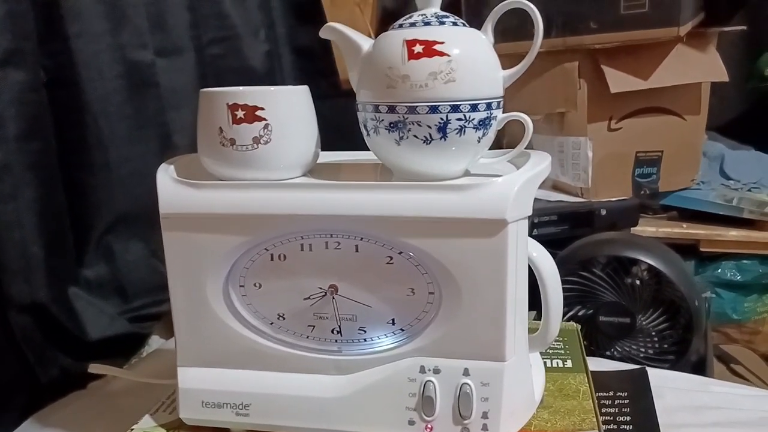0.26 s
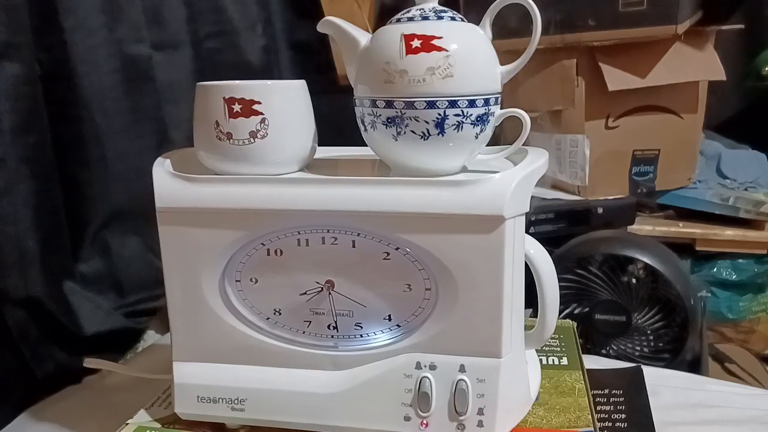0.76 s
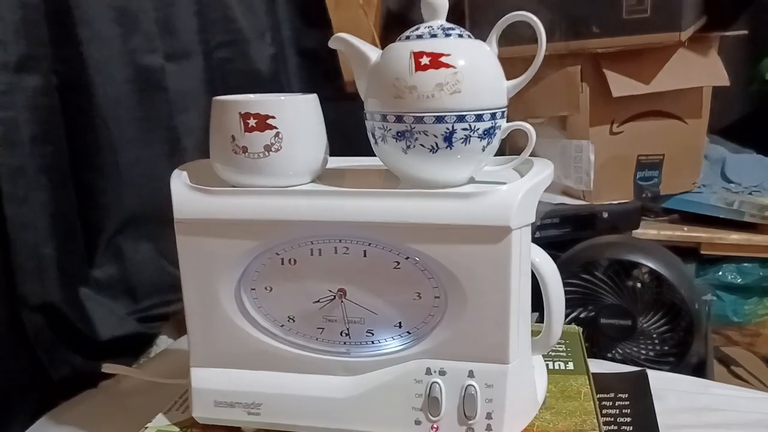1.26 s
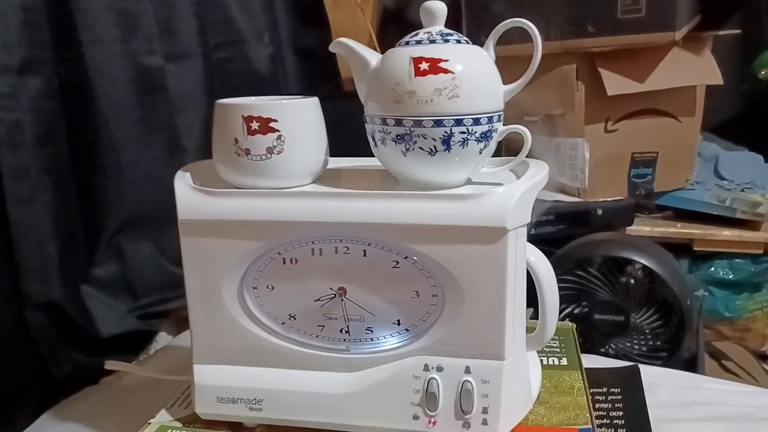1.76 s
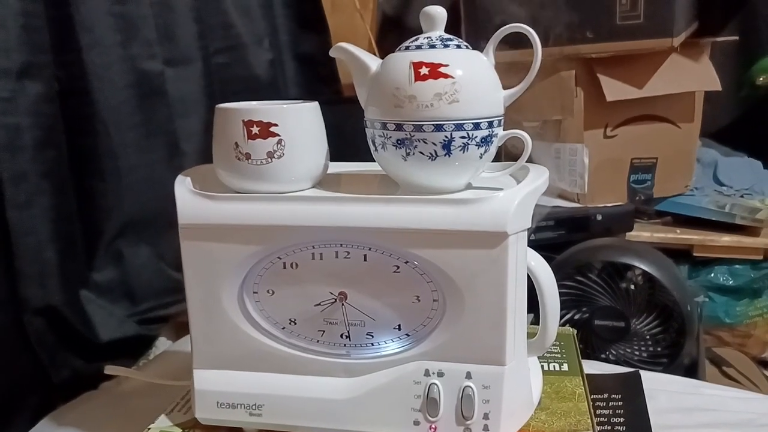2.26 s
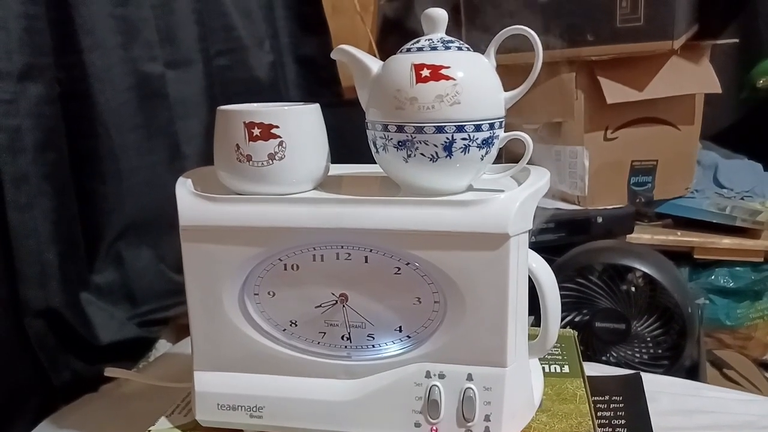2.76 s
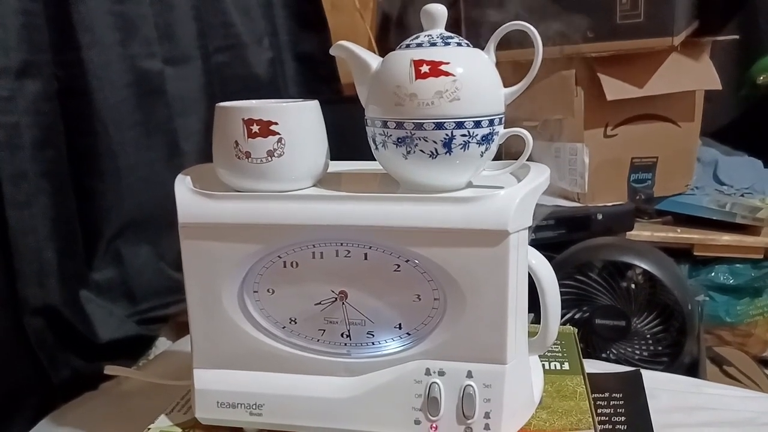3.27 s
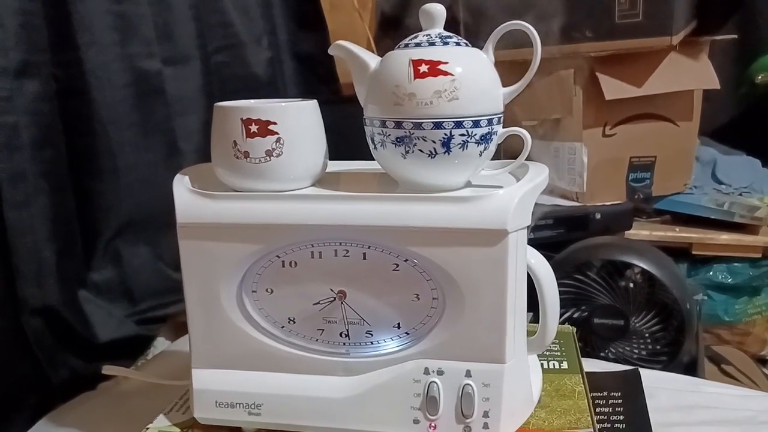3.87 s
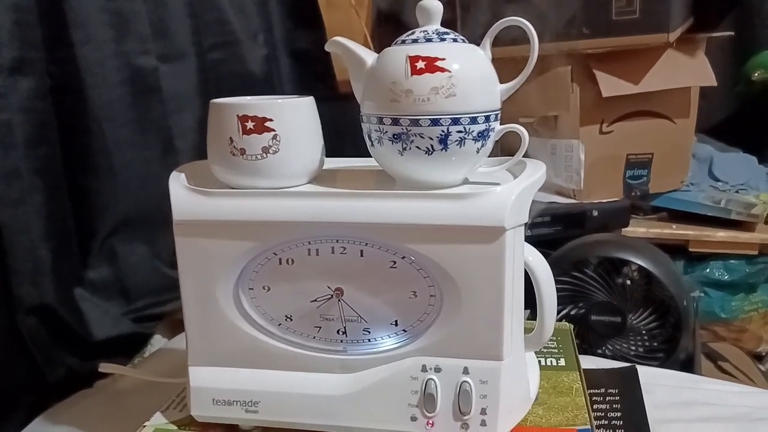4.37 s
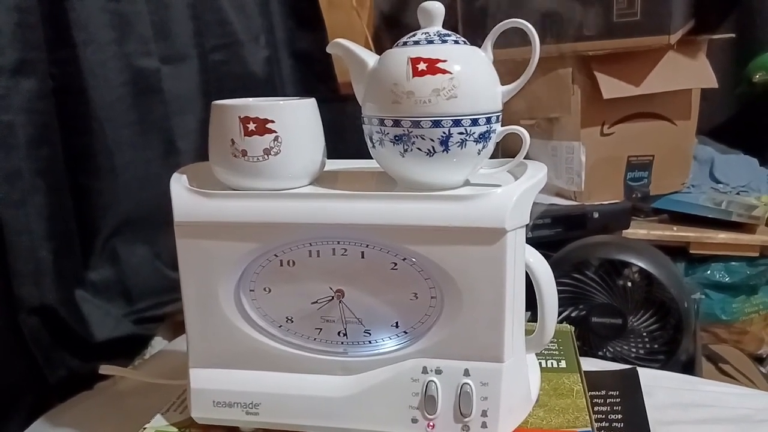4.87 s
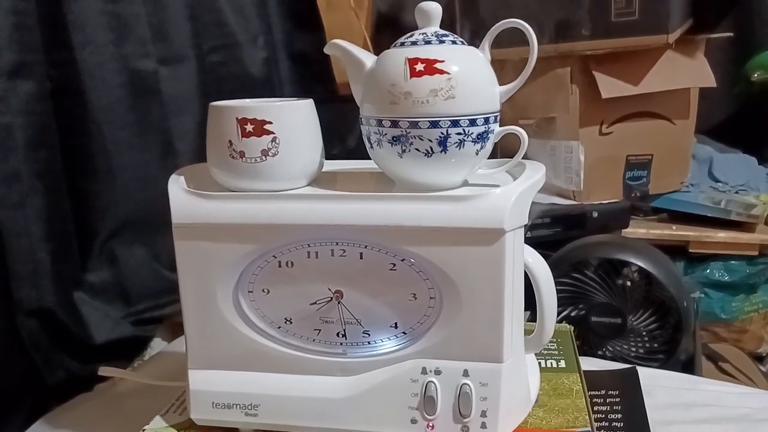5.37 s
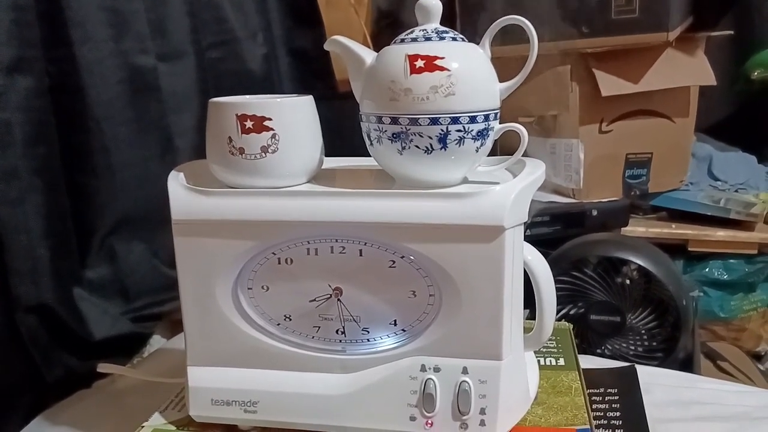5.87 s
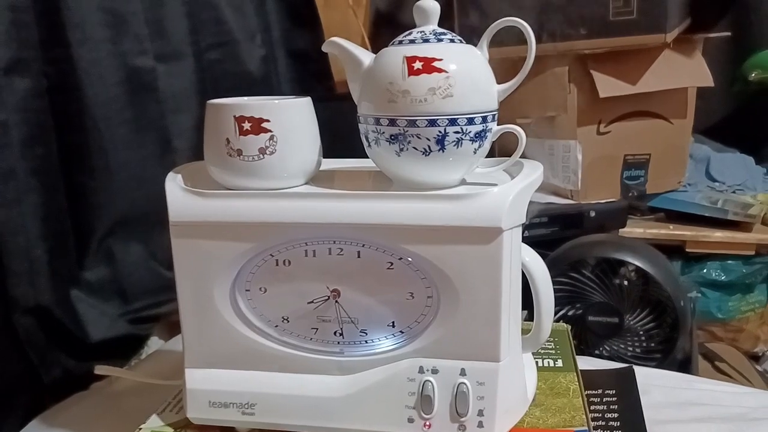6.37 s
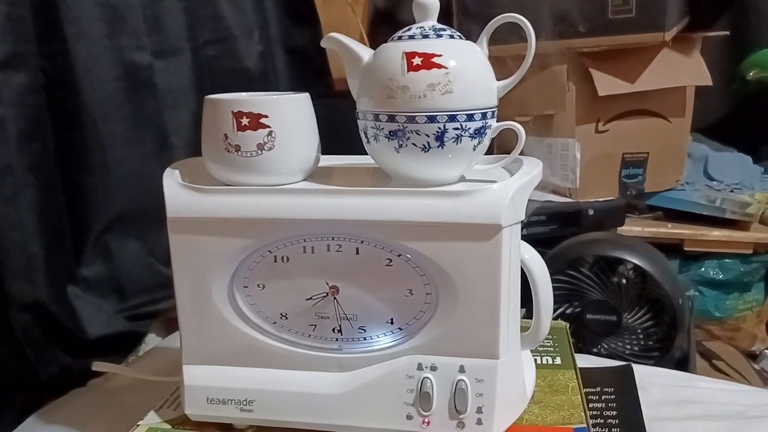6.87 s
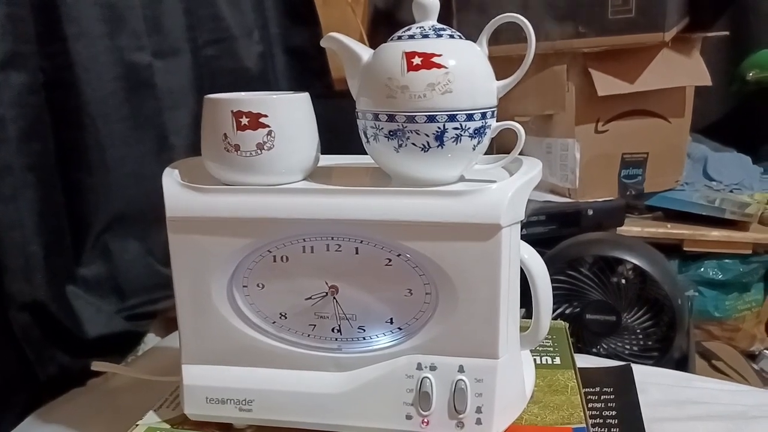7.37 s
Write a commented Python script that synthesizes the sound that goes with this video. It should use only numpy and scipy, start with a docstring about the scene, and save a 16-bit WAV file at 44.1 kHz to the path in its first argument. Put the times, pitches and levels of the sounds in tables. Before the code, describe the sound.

Water boils hard inside a small bedside tea maker, hollow rapid bubbling rumble gradually breaking into spluttering gurgles and fizzing spits, close up indoors.

```python
"""Small furnished room: a bedside tea maker boils close to two microphones.
Water boils in surges, about four a second; collapsing bubbles (short pushes) ring the tank's resonances hollowly.
The steady rumble breaks up into splutters; spits ping the case and throw bursts of fizz (shaped noise).
A thin steam hiss fades early. The clock ticks (paired clicks through a gear resonance).
A faint gliding sine whine arcs up and down three times, over steady room noise."""
import sys
import numpy as np
from scipy import signal
from scipy.fft import rfft, irfft
from scipy.io import wavfile
from scipy.ndimage import uniform_filter1d, map_coordinates

SR = 44100
rng = np.random.default_rng(int(sys.argv[2]) if len(sys.argv) > 2 else 0)


def transcribe(u):
    """Save the signal u as a 16-bit wav file named by the first command-line argument.

    u: samples, shape (n,) or (channels, n), limited to [-1, 1]; the rate is SR.
    q: integer samples, one column per channel.
    """
    v = np.clip(np.atleast_2d(u).T, -1, 1)
    q = np.round(v * 32767).astype(np.int16)
    wavfile.write(sys.argv[1], SR, q)


N = 336924
TIME = np.arange(N) / SR
SIZE = 2 ** 15  # samples per impulse response
FREQ = np.maximum(np.fft.rfftfreq(SIZE, 1 / SR), 1)
TOP_HZ = 15700

# room and microphone hiss: (frequency [Hz], relative density [dB per Hz])
AIR_COLOUR = [(42, -35.5), (62, 5), (120, 2.5), (550, -1.5), (1100, -17.5), (3500, -25.5), (13000, -33.5)]
# microphone imbalance: (frequency [Hz], left minus right [dB])
BALANCE = [(110, -0.5), (370, -1.5), (600, 2), (1500, -9), (2300, -13), (5500, 2.5)]
# steady simmer: (time [s], level [dB])
SIMMER_LEVEL = [(0, -44.5), (1.2, -66.5), (2, -71.5), (7.64, -68.5)]
# surges of boiling on the element: (time of height [s], level [dB], fall to 1/e power [s])
BOIL_SURGES = [(0.064,-46.5,0.01),(0.218,-41,0.038),(.445,-48,0.083),(0.691,-39.5,0.047),(0.79,-47.5,0.047),(1.066,-43.5,0.079),(1.373,-54,0.084),(1.572,-50,0.062),(1.812,-47,0.04),(2.09,-47.5,0.036),(2.225,-56.5,0.031),(2.368,-50.5,0.099),(2.645,-49,0.058),(2.9,-51.5,0.082),(3.16,-49.5,0.042),(3.443,-43.5,0.033),(3.634,-48.5,0.026),(3.85,-55.5,0.12),(4.133,-54,0.054),(4.372,-58,0.077),(4.538,-51.5,0.028),(4.765,-54.5,0.057),(4.961,-56,0.076),(5.187,-47.5,0.024),(5.394,-52,0.048),(5.626,-50.5,0.039),(5.886,-50.5,0.042),(6.189,-54,0.094),(6.419,-52.5,0.048),(6.629,-50,0.041),(6.955,-54,0.025),(7.115,-55.5,0.037),(7.298,-52,0.031)]
# large steam bubbles collapsing: (time [s], level [dB])
BUBBLE_COLLAPSES = [(0.01, -27), (0.063, -25.5), (0.155, -23), (0.174, -22.5), (0.208, -17), (0.226, -15),
                    (0.268, -21), (0.319, -30), (0.359, -22), (0.427, -25.5), (0.456, -20.5), (0.495, -21),
                    (0.545, -19.5), (0.616, -21), (0.659, -21), (0.669, -24), (0.699, -18), (0.739, -23),
                    (0.777, -21), (0.809, -19.5), (0.853, -23.5), (0.867, -19), (0.914, -22),
                    (0.977, -24.5), (1.018, -22), (1.046, -17), (1.067, -21), (1.174, -20), (1.21, -21),
                    (1.267, -26.5), (1.302, -30), (1.32, -24), (1.364, -25), (1.393, -23), (1.452, -26.5),
                    (1.565, -21.5), (1.583, -20), (1.61, -22.5), (1.7, -27.5), (1.792, -21), (1.839, -17.5),
                    (1.91, -24.5), (2.068, -24.5), (2.177, -32.5), (2.192, -31), (2.223, -26.5),
                    (2.304, -28), (2.339, -22), (2.407, -18), (2.517, -23.5), (2.618, -21.5),
                    (2.656, -22.5), (2.691, -29), (2.754, -30), (2.807, -24), (2.855, -26.5),
                    (2.898, -20.5), (2.92, -16), (2.95, -22), (3.008, -35.5), (3.066, -24.5), (3.087, -20),
                    (3.118, -24.5), (3.164, -21.5), (3.192, -24.5), (3.339, -30), (3.408, -19.5),
                    (3.421, -20), (3.458, -21), (3.593, -29), (3.654, -22.5), (3.773, -25.5),
                    (3.887, -23.5), (3.95, -25), (3.985, -29.5), (4.022, -29), (4.107, -35), (4.152, -26),
                    (4.259, -32), (4.346, -24.5), (4.402, -22.5), (4.517, -17.5), (4.652, -32), (4.7, -28),
                    (4.736, -27.5), (4.76, -25), (4.788, -22.5), (4.938, -26.5), (4.976, -26.5),
                    (5.029, -23), (5.087, -32), (5.178, -19.5), (5.253, -26.5), (5.373, -22), (5.391, -20),
                    (5.41, -24), (5.441, -22), (5.492, -23), (5.585, -19.5), (5.616, -19), (5.637, -18.5),
                    (5.751, -32), (5.805, -26.5), (5.839, -27), (5.866, -17), (5.92, -23.5), (6.029, -32.5),
                    (6.064, -28), (6.172, -24.5), (6.276, -26.5), (6.326, -28.5), (6.373, -29),
                    (6.403, -21), (6.426, -28.5), (6.54, -24.5), (6.603, -24.5), (6.637, -21), (6.653, -25),
                    (6.751, -30.5), (6.803, -24), (6.833, -29), (6.88, -34), (6.976, -30), (7.039, -27.5),
                    (7.127, -27), (7.166, -26), (7.295, -25.5), (7.466, -37), (7.522, -28), (7.603, -38.5)]
# resonances of the water-filled tank: (frequency [Hz], width at half power [Hz], relative level [dB])
TANK_MODES = [(66, 7.5, -26), (115.9, 35, -8.5), (158, 32, -18.5), (221.3, 30.8, -6.5), (263.8, 53, -6.5),
              (389.6, 51, -12.5), (470.1, 23, -6), (538, 53.6, 0), (566, 49, -4.5), (660.7, 47.6, -4.5),
              (822, 55, -22)]
# modes of the case: (frequency [Hz], width at half gain [Hz], relative level [dB])
CASE_MODES = [(1594, 220, -9.5), (2614, 190, -11.5), (3460, 310, -10), (3840, 270, -13.5)]
# bubbles bursting on hot metal: (time [s], relative level [dB])
METAL_SPITS = [(0.07,-22),(.186,-11.5),(.226,-27),(0.459,-16.5),(.524,-21),(.564,-17),(.66,-19),(0.685,-15),(0.78,-16),(1.077,-12.5),
               (1.176,-25),(1.213,-21.5),(1.268,-21.5),(1.392,-24),(2.079,-31),(2.095,-19),(2.517,-27.5),(2.691,-21.5),
               (3.411,-24),(3.445,-15),(4.151,-23.5),(4.516,-26),(5.412,-26),(5.662,-27),(5.868,-24),
               (6.426,-23.5),(6.49,-29),(6.539,-26),(6.657,-20)]
# colour of the fizz: (frequency [Hz], relative density [dB per Hz])
FIZZ_COLOUR = [(900, 9), (1300, -7.5), (1650, -13), (2100, -7.5), (2620, -1.5), (2950, -7), (3400, 9),
               (3950, -1), (4500, -17), (6300, -7), (7600, -30), (15500, -26.5)]
# whine arcs: (time of top [s], top pitch [Hz], half length [s], level [dB])
WHINE_ARCS = [(1.352, 9380, 0.22, -73.5), (4.094, 9700, 0.23, -75.5), (6.5, 9440, 0.21, -81),
              (6.668, 9130, .1, -82)]


def undb(db):
    """Decibels to gain."""
    return 10 ** (np.asarray(db) / 20)


def unit(x):
    """Scale to rms 1."""
    return x / np.sqrt(np.mean(x ** 2))


def colour(points):
    """Gain over FREQ, interpolated in dB over log frequency."""
    hz, db = np.transpose(points)
    return undb(np.interp(np.log(FREQ), np.log(hz), db))


def causal(gain):
    """Minimum-phase impulse response with this gain, by folding the cepstrum."""
    cepstrum = irfft(np.log(gain))
    cepstrum[1:SIZE // 2] *= 2
    cepstrum[SIZE // 2 + 1:] = 0
    return irfft(np.exp(rfft(cepstrum)))


def ring(x, response):
    """Convolve, cut to N samples."""
    return signal.fftconvolve(x, response)[:N]


def resonance(hz, half_width_hz):
    """Gain of one resonance; half gain at half_width_hz off centre."""
    return 1 / (1 + ((FREQ - hz) / half_width_hz) ** 2)


def softness(push_s):
    """Short smooth push of area 1, peaking at twice push_s."""
    t = np.arange(400) / SR
    push = (t / push_s) ** 2 * np.exp(-t / push_s)
    return push / push.sum()


def strikes(times_s, sizes):
    """Impulse train."""
    places = np.clip(times_s * SR, 0, N).astype(int)
    return np.bincount(places, sizes, N + 1)[:N]


def patter(rate_hz, spread_db):
    """Random impulses of either sign; exponential spread of dB sizes; rms 1."""
    present = rng.random(N) < rate_hz / SR
    size = np.minimum(rng.exponential(size=N), 4)
    sign = rng.choice([-1, 1], N)
    return unit(present * sign * undb(spread_db * size))


def air(air_db=-68, apart_hz=900):
    """Steady room noise: shared in the bass, unrelated in the treble."""
    own = 1 / np.sqrt(1 + (apart_hz / FREQ) ** 2)
    shared_response = causal(colour(AIR_COLOUR) * np.sqrt(1 - own ** 2))
    own_response = causal(colour(AIR_COLOUR) * own * np.sqrt(2))
    shared = ring(rng.standard_normal(N), shared_response)
    apart = np.array([ring(rng.standard_normal(N), own_response) for _ in range(2)])
    return undb(air_db) * unit(shared + apart)


def seething(rise_share=0.78):
    """Boil amplitude: simmer plus surges that rise a little faster than they fall."""
    power = undb(2 * np.interp(TIME, *np.transpose(SIMMER_LEVEL)))
    for height_s, db, fall_s in BOIL_SURGES:
        age = (TIME - height_s) / fall_s
        square = np.minimum(age, age / rise_share) ** 2
        power = power + undb(2 * db) * np.exp(-np.minimum(square, 20))
    return np.sqrt(power)


def churning(memory_s):
    """Power stirred up by the large collapses, decaying exponentially."""
    time_s, db = np.transpose(BUBBLE_COLLAPSES)
    return np.abs(ring(strikes(time_s, undb(2 * db)), np.exp(-TIME[:SIZE] / memory_s)))


def wake(wake_s=0.013):
    """Amplitude of the churn left by the large collapses."""
    return np.sqrt(churning(wake_s))


def frothing(seethe, depth=0.11, memory_s=0.0099, froth_db=-32):
    """Fizz drive: follows the boil, flares with each collapse and sinks until the next."""
    churn = churning(memory_s)
    usual = np.abs(uniform_filter1d(churn, size=5000)) + 1e-7
    flare = (churn / usual + .1) ** depth
    return np.hypot(seethe * flare, undb(froth_db) * wake())


def sloshed(response, shift):
    """Ring moved in pitch by a share, as the water moves."""
    samples = np.arange(len(response))
    return np.interp(samples * (1 + shift), samples, response)


def collapses(response, mean_push_s=0.00011, low_hz=420, high_hz=790, cycles=2.09, mean_wobble=2.41,
              lead_s=0.001998, flurry_s=0.008, fragment_peak=0.5024, slosh_span=0.03, count=5):
    """Each bubble slams shut amid fragments; leftover gas wobbles at its own pitch, all ringing the tank."""
    t = np.arange(1600) / SR
    span, slam = 8192, 600  # samples: plop length, slam position
    out = np.zeros(N + 2 * span)
    for time_s, db in BUBBLE_COLLAPSES:
        speed, size, sway, depth = rng.random(4)
        when, force = rng.random((2, count))
        hz = low_hz * (high_hz / low_hz) ** size
        age_s = np.maximum(t - slam / SR, 0)
        wobble = mean_wobble * (.5 + sway) * 2 * hz / (cycles * SR)
        push = wobble * np.sin(2 * np.pi * hz * age_s) * np.exp(-age_s * hz / cycles)
        push[slam] += 1
        # fragments start lead_s before the slam, then thin out exponentially
        moments = slam - (lead_s + flurry_s * np.log(when)) * SR
        moments = np.clip(moments, 0, len(t) - 1).astype(int)
        push += np.bincount(moments, fragment_peak * (2 * force - 1), len(t))
        body = sloshed(response[:span - len(t)], slosh_span * (depth - .5))
        soft = softness(mean_push_s * (.5 + speed))
        plop = irfft(rfft(push, span) * rfft(soft, span) * rfft(body, span))
        peak = np.sqrt(2 * uniform_filter1d(plop ** 2, size=130).max())
        start = max(int(time_s * SR), 0)
        out[start:start + span] += undb(db) * plop / peak
    return out[slam:slam + N]


def tank_response(leak_db=-51, bass_lag_s=0.0057, bass_hz=170):
    """Tank resonances plus wall leakage; the bass follows a moment late."""
    power = sum((undb(db) * resonance(hz, .77 * width_hz)) ** 2 for hz, width_hz, db in TANK_MODES)
    power = power + undb(2 * leak_db) / (1 + (FREQ / 3000) ** 6)
    prompt = causal(np.sqrt(power) / np.sqrt(1 + (58 / FREQ) ** 14))
    # integrate group delay to phase, in cycles
    late = np.cumsum(bass_lag_s * np.exp(-(FREQ / bass_hz) ** 2)) * SR / SIZE
    return irfft(rfft(prompt) * np.exp(-2j * np.pi * late))[:SIZE // 2]


def tank(seethe, wake_db=-18.5, seethe_db=12, glug_db=7.02, calm_db=-70, stray_db=-63, slosh_rms=0.045):
    """Large, small and stray collapses and soft glugs ring one tank."""
    response = tank_response()
    # small bubbles die out in calm water, where strays remain
    boiling = seethe / (1 + (undb(calm_db) / seethe) ** 2)
    stir = np.hypot(undb(seethe_db) * boiling, undb(wake_db) * wake())
    pops = patter(rate_hz=170, spread_db=0) * stir
    strays = undb(stray_db) * patter(rate_hz=42, spread_db=3)
    small = ring(pops + strays, softness(.0001))
    glugs = ring(patter(rate_hz=70, spread_db=4.5) * stir, softness(.00071))
    crowd = (small + undb(glug_db) * glugs) / np.linalg.norm(response)
    # the rocking surface bends the small bubbles' ring up and down
    bend = slosh_rms * unit(uniform_filter1d(rng.standard_normal(N), size=900))
    drift_samples = signal.lfilter([1], [1, -.9995], bend)
    bent = map_coordinates(ring(crowd, response), [np.arange(N) + drift_samples], mode="mirror")
    return collapses(response) + bent


def pings(froth, ping_db=-3, lively_db=-58, jolt_db=-13, hardness_spread_db=2, mix_spread_db=2.5,
          jolt_tilt_db=-4, snap_tilt_db=2, detune=0.039):
    """Collapses, spits and snaps ring the case in varied mixes; sloshing water shifts each ring's pitch."""
    time_s, knock_db = np.transpose(BUBBLE_COLLAPSES)
    spit_s, spit_db = np.transpose(METAL_SPITS)
    hardness_db = hardness_spread_db * rng.standard_normal(len(time_s))
    jolts = strikes(time_s + .001, undb(knock_db + jolt_db + hardness_db))
    snaps = undb(ping_db) * patter(rate_hz=120, spread_db=3.5) * froth / (1 + undb(lively_db) / froth)
    sharp = snaps + strikes(spit_s, undb(spit_db))
    out = 0
    for hz, width_hz, db in CASE_MODES:
        # tilts in dB per octave: jolts favour low modes, snaps and spits high ones
        sharp_gain = undb(snap_tilt_db * np.log2(hz / CASE_MODES[2][0]))
        jolt_gain = undb(jolt_tilt_db * np.log2(hz / CASE_MODES[0][0]))
        blows = sharp_gain * sharp + jolt_gain * jolts
        blows = blows * undb(mix_spread_db * rng.standard_normal(N))
        slosh = rng.integers(-1, 2, N)
        for shift in (-1, 0, 1):
            mode = causal(resonance(hz * (1 + detune * shift), width_hz / 2))
            out = out + undb(db) * ring(blows * (slosh == shift), mode / np.linalg.norm(mode))
    return out


def fizz(froth, fizz_db=-6, knock_db=-39, knock_spread_db=2, spray_db=-34, spray_s=0.017,
         grain_s=0.0018, tail_s=0.0047, tail_db=-4, shared=0.41):
    """Tiny bubbles crackle, collapses fizz, spits spray: noise bursts smeared by case and walls."""
    time_s, db = np.transpose(BUBBLE_COLLAPSES)
    spit_s, spit_db = np.transpose(METAL_SPITS)
    t = np.arange(SIZE) / SR
    # power envelopes
    smear = np.exp(-t / grain_s) / grain_s + undb(2 * tail_db) * np.exp(-t / tail_s) / tail_s
    crackle = (undb(fizz_db) * patter(rate_hz=630, spread_db=2) * froth) ** 2
    knock_level_db = db + knock_db + knock_spread_db * rng.standard_normal(len(time_s))
    knocks = strikes(time_s, undb(2 * knock_level_db))
    spray = ring(strikes(spit_s, undb(2 * (spit_db + spray_db))), np.exp(-t / spray_s))
    power = ring(crackle, smear / smear.sum()) + ring(knocks, smear / smear[0]) + spray
    level = np.sqrt(np.abs(power))
    common, out = rng.standard_normal(N), []
    for side in (1, -1):  # left, right
        own = np.sqrt(1 - shared ** 2) * rng.standard_normal(N)
        grains = level * (shared * common + own)
        out.append(ring(grains, causal(colour(FIZZ_COLOUR) * colour(BALANCE) ** (side / 2))))
    return np.array(out) / np.linalg.norm(causal(colour(FIZZ_COLOUR)))


def steam(froth, hz=11300, half_width_hz=350, upper_hz=12800, upper_db=-9, steam_db=-28.5):
    """Thin band-filtered hiss that puffs with the bubbles and lasts only while the boil is steady."""
    band = causal(resonance(hz, half_width_hz) + undb(upper_db) * resonance(upper_hz, half_width_hz))
    hiss = unit(np.array([ring(rng.standard_normal(N), band) for _ in range(2)]))
    lasting = np.interp(TIME, [1.2, 1.32], [1, 0])
    puff = froth * np.sqrt(froth / froth.max())
    return undb(steam_db) * hiss * puff * lasting


def clock(hz=1820, upper_hz=2350, upper_db=-6, half_width_hz=130, tick_db=-45, catch_s=0.007, catch_db=1,
          rattle_s=0.012, rattle_db=-20, uneven_db=0.5):
    """About once a second the hand steps, then catches; the plastic gear rings and rattles."""
    steps_s = np.arange(.892, N / SR, 1.0052)
    gear = causal(resonance(hz, half_width_hz) + undb(upper_db) * resonance(upper_hz, half_width_hz))
    sizes = undb(uneven_db * rng.standard_normal(len(steps_s)))
    blows = strikes(steps_s, sizes) + undb(catch_db) * strikes(steps_s + catch_s, sizes)
    rattle_level = undb(rattle_db) * ring(blows, np.exp(-TIME[:SIZE] / rattle_s))
    rattle = rattle_level * rng.standard_normal(N)
    return undb(tick_db) * ring(blows + rattle, gear / np.linalg.norm(gear))


def whine(fall_hz=1150, waver_hz=22, fade_hz=520, flicker_db=3, right_minus_left_db=8):
    """Flickering sine off to the right, strongest at the top of each arc; the last arc rises again."""
    top_s, top_hz, half_s, db = np.transpose(WHINE_ARCS)
    sags_hz = fall_hz * np.minimum(((TIME[:, None] - top_s) / half_s) ** 2, 4)
    arc = np.argmax(top_hz - sags_hz, axis=1)  # highest pitch wins
    sag_hz = sags_hz[np.arange(N), arc]
    waver, flicker = unit(uniform_filter1d(rng.standard_normal((2, N)), size=700))
    hz = top_hz[arc] - sag_hz + waver_hz * waver
    level = undb(db[arc] + flicker_db * flicker) * np.exp(-sag_hz / fade_hz)
    tone = level * np.sin(2 * np.pi * np.cumsum(hz) / SR)
    return np.outer(undb([-right_minus_left_db / 2, right_minus_left_db / 2]), tone)


def room(x, t60_s=0.091, low_db=-16, high_db=-1, split_hz=1000, build_s=0.0041):
    """Bass arrives mostly direct; treble also comes off the walls, differently at each microphone."""
    t = np.arange(SIZE) / SR
    wet = undb(low_db + (high_db - low_db) / (1 + (split_hz / FREQ) ** 4))
    fade = undb(-60 * t / t60_s) * np.minimum(t / build_s, 1)
    out = []
    for side in (1, -1):  # left, right
        tail = rng.standard_normal(SIZE) * fade
        walls = 1 + rfft(tail / np.linalg.norm(tail)) * rfft(causal(wet))
        microphone = causal(colour(BALANCE) ** (side / 2) / np.sqrt(1 + wet ** 2 / 2))
        out.append(ring(x, irfft(walls * rfft(microphone))))
    return np.array(out)


def scene():
    """Boiling tank, clock and whine over room noise."""
    seethe = seething()
    froth = frothing(seethe)
    knocks = room(tank(seethe) + pings(froth) + clock())
    left, right = knocks + fizz(froth) + steam(froth) + whine()
    # tank slightly nearer the right microphone: left lags 3 samples
    left = np.pad(left, (3, 0))[:N]
    return np.array([left, right]) + air()


def record(dry):
    """Steep elliptic low-pass at TOP_HZ: the phone cuts the top."""
    low_pass = signal.ellip(8, .2, 70, TOP_HZ, fs=SR, output="sos")
    return signal.sosfilt(low_pass, dry)


dry = scene()
out = record(dry)
transcribe(out)
```